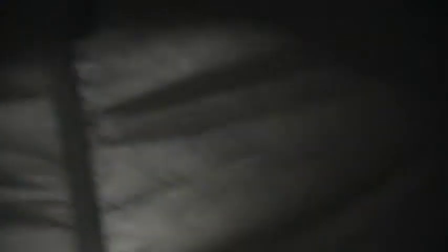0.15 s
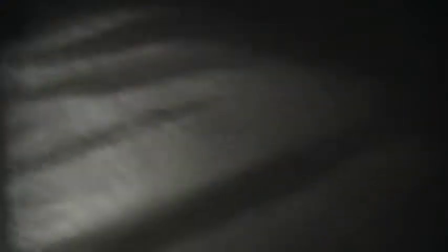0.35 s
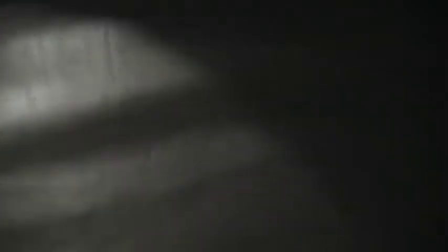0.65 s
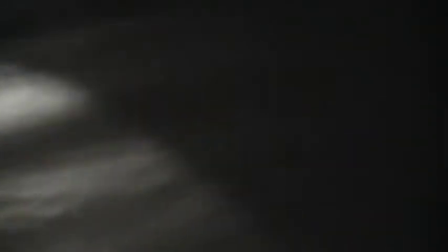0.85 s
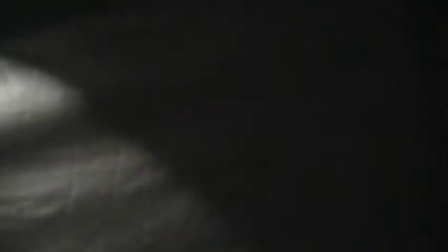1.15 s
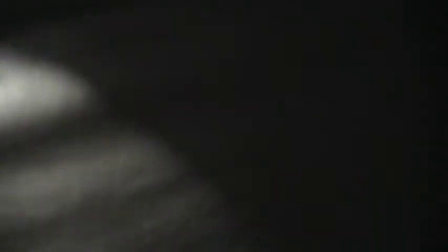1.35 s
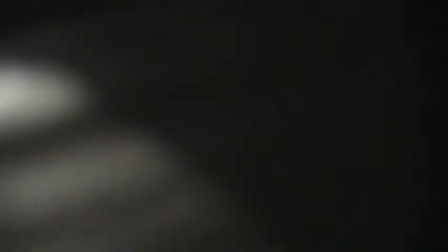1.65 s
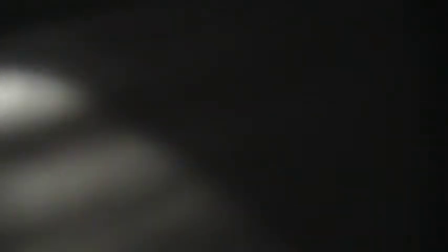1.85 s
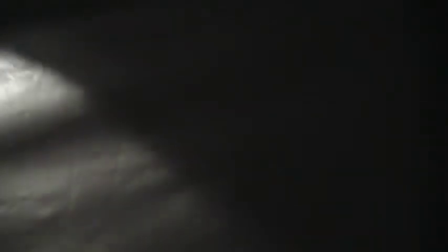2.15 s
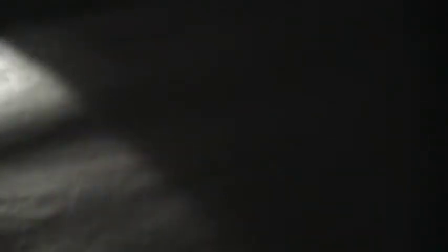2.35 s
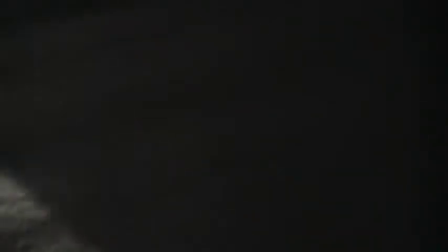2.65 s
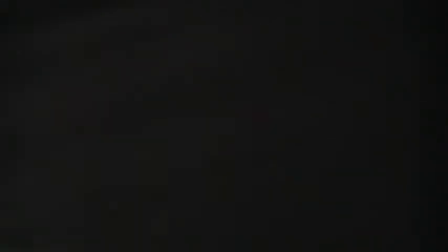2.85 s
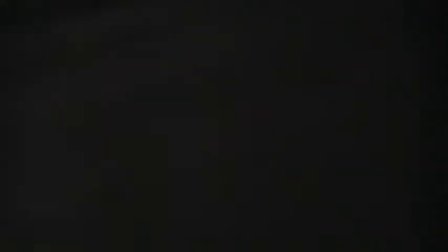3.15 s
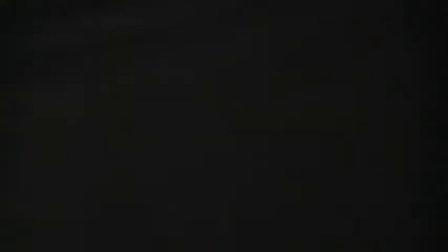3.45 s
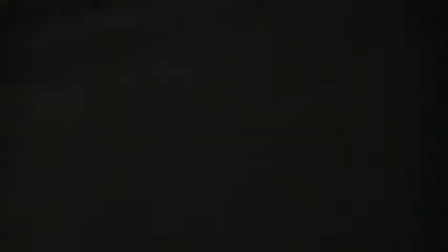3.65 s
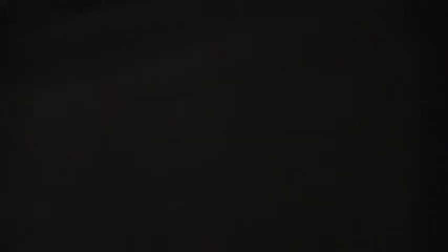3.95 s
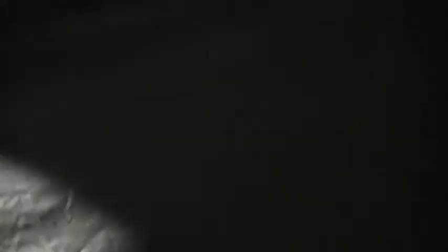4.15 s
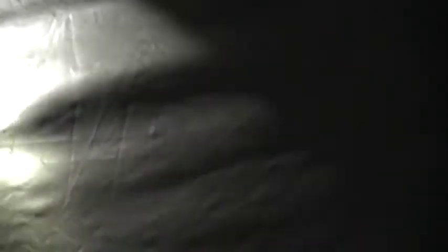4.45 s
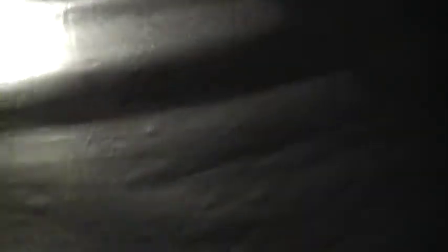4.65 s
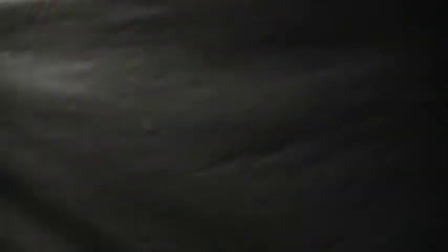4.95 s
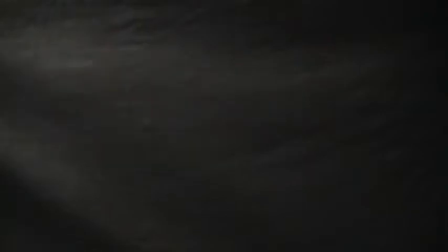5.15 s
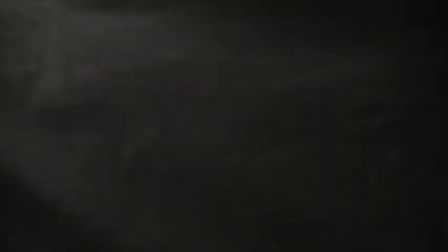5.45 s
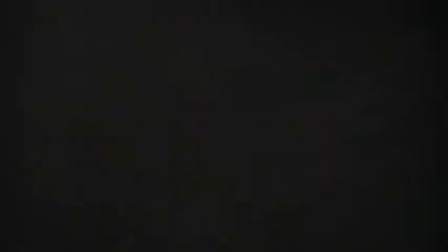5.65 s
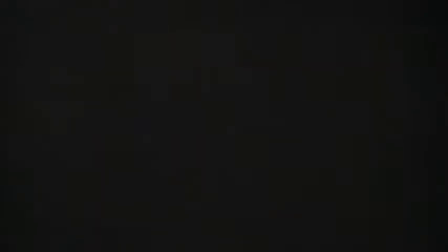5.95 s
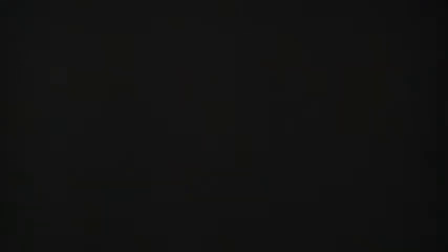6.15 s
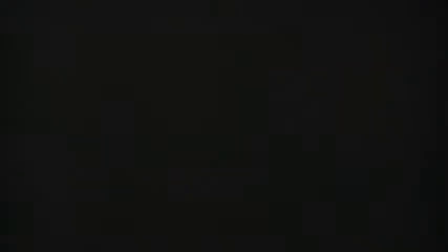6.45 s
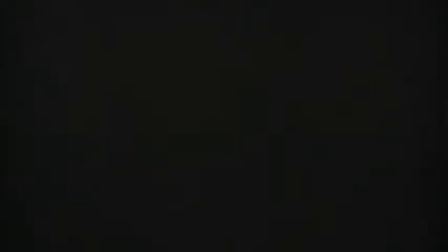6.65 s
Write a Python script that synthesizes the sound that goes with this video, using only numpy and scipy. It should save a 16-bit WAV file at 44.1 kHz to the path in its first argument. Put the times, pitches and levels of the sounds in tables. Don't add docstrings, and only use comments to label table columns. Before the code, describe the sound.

A buckle snaps sharply, nylon rustles, then a tent zipper buzzes open close by in fast and slow strokes over faint hiss.

```python
import sys
import numpy as np
from scipy import signal
from scipy.fft import rfft, irfft, next_fast_len
from scipy.io import wavfile
from scipy.ndimage import uniform_filter1d

SR = 44100
rng = np.random.default_rng(int(sys.argv[2]) if len(sys.argv) > 2 else 0)


def makeup_ratio(level_db):
    decades = np.asarray(level_db, float) / 20
    return 10 ** decades


def wav_record(signal):
    frames = np.transpose(np.atleast_2d(signal))
    bounded = np.clip(frames, -1, 1)
    quanta = np.round(bounded * 32767).astype(np.int16)
    wavfile.write(sys.argv[1], SR, quanta)


N = 299829


def line(table, column):
    columns = np.transpose(sorted(table))
    return np.interp(np.arange(N) / SR, columns[0], columns[column])


def span(table, fade_s=0.019):
    t = np.arange(N) / SR
    inside_s = np.minimum(t - table[0][0], table[-1][0] - t)
    return np.clip(inside_s / fade_s + 1, 0, 1)


def band(x, lo_hz, hi_hz):
    return signal.sosfilt(signal.butter(2, [lo_hz, hi_hz], "band", fs=SR, output="sos"), x)


def even(x, seconds):
    power = np.mean(np.atleast_2d(x) ** 2, axis=0)
    return x / np.sqrt(uniform_filter1d(power, int(seconds * SR)) + 1e-12)


def shape(x, gain_at):
    size = next_fast_len(N, True)
    hz = np.maximum(np.fft.rfftfreq(size, 1 / SR), 1)
    return irfft(rfft(x, size) * gain_at(hz), size)[..., :N]


def share_of(x, lo_hz, hi_hz, tilt):
    def step(f, hz):
        return np.sin(np.pi / 2 * np.clip(0.5 + np.log2(f / hz) / 0.9, 0, 1)) ** 2
    return shape(x, lambda f: (step(f, lo_hz) - step(f, hi_hz)) * f ** tilt)


def coloured(points):
    hz, db = np.transpose(points)
    white = rng.standard_normal((2, N))
    x = shape(white, lambda f: makeup_ratio(np.interp(np.log(f), np.log(hz), db, -90, -90)))
    return x / x.std()


def walk(rate_hz):
    hold = int(SR / rate_hz)
    steps = np.repeat(rng.standard_normal(N // hold + 1), hold)
    return 1.3 * uniform_filter1d(uniform_filter1d(steps, hold), hold)[:N]


def blend(pair, alike):
    alike = np.clip(alike, 0, 1)
    return np.array([pair[0], alike * pair[0] + np.sqrt(1 - alike ** 2) * pair[1]])


def grains(per_s, spread_db):
    present = rng.random((2, N)) < per_s / SR
    size_db = spread_db * np.minimum(rng.exponential(size=(2, N)), 4)
    return present * rng.standard_normal((2, N)) * makeup_ratio(size_db)


def knocks(times, sizes):
    at, out = np.asarray(times) * SR, np.zeros(N + 2)
    i = np.clip(at.astype(int), 0, N)
    np.add.at(out, i, sizes * (1 - at + i))
    np.add.at(out, i + 1, sizes * (at - i))
    return out[:N]


# pitch_hz, level_db (per Hz)
HUSH = [(12, -42), (20, -12), (75, -4.5), (124, -10.5), (155, -14), (257, -18.5), (630, -15.5),
        (1420, -31.5), (7030, -37.5), (8560, -28.5), (9310, -35.5), (13800, -33.5), (16300, -49)]
HUSH_DB = -56.5
# pitch_hz, level_db
MOTOR = [(7854, -86.5), (8473, -82), (11423, -85), (12662, -109), (13324, -90), (14077, -84.5)]


def hush():
    t = np.arange(N) / SR
    lines = 0
    for hz, db in MOTOR:
        cycles = hz * t + 0.3 * walk(12)
        lines = lines + makeup_ratio(db) * np.sqrt(2) * np.sin(2 * np.pi * cycles)
    return blend(coloured(HUSH), 0.29) * makeup_ratio(HUSH_DB + 0.29 * walk(1.7)) + lines


# peak_s, rise_s and fall_s (for 20 dB), level_db, brightness_db
RUSTLES = [(0.005, 0.06, 0.1164, -39, 1.5), (.21, .3, 0.14, -47.5, 4), (.43, .2, 0.1, -59, 5),
           (.556, 0.057, 0.28, -51, -4), (.602, 0.027, 0.16, -49, -7.5), (.68, .05, 0.74, -57, -4.5),
           (1.22, 0.11, .08, -65, 5), (2.37, .22, 0.1782, -51, -2.5), (2.483, .04, .12, -50, -5.5),
           (2.645, 0.018, 0.22, -48, 7), (3.16, .04, 0.3, -62, -6), (3.36, .25, 0.4, -52, 1),
           (3.57, 0.0614, 0.25, -53.5, -7.5), (3.749, 0.11, .05, -43.5, 0), (3.786, 0.0273, 0.8, -53, -9.5),
           (4.41, 0.24, 0.37, -44, 13.5), (4.65, .25, 0.39, -47, 12), (5.02, .1, 0.13, -52.5, 11),
           (6.34, .06, 0.15, -52, -5), (6.436, 0.013, 0.05, -43.5, -5.5), (6.497, 0.0136, 0.11, -52.5, 8.5)]
# start_s, length_s, level_db, brightness_db
SLIDES = [
    (0.072, 0.16, -53.5, 0),
    (0.929, 0.087, -64, 6.5),
    (2.63, 0.44, -50, 4),
    (3.096, 0.615, -63.5, 0.5),
    (4.271, 0.2, -46.5, 10.5),
    (4.98, 0.26, -56, -6),
    (6.175, 0.28, -55.5, -2.5),
    (6.235, 0.15, -52, 8),
    (6.461, .34, -61, -3),
]
SLIDE_RISE_S, SLIDE_FALL_S = 0.04, 0.0855
REST_DB, REST_BRIGHT_DB = -68, -3.5
# level_db, brightness_share
CLOTH_LAYERS = [(1.5, -1.05), (0.24, 0.14), (-2.5, 0.33), (-1.5, 1.035)]


def handling():
    t = np.arange(0, N + 64, 64) / SR
    moves = [(s, s, rise, fall, db, bright) for s, rise, fall, db, bright in RUSTLES]
    moves += [(s, s + length, SLIDE_RISE_S, SLIDE_FALL_S, db, bright) for s, length, db, bright in SLIDES]
    start, end, rise, fall, db, bright = np.transpose(moves)[..., None]
    level_db = db - 20 * (np.maximum(start - t, 0) / rise + np.maximum(t - end, 0) / fall)
    gains = []
    for own_db, share in CLOTH_LAYERS:
        resting = makeup_ratio(2 * (REST_DB + own_db + share * REST_BRIGHT_DB))
        moving = np.sum(makeup_ratio(2 * (level_db + own_db + share * bright)), axis=0)
        gains.append(np.interp(np.arange(N) / SR, t, np.sqrt(resting + moving)))
    return gains


CLOTH_EDGES_HZ = (100, 1700, 4500, 9000)
# pitch_hz, level_db (per Hz)
SHEEN = [(4710, -41.5), (8000, -23), (9200, -12.5), (11600, -7), (14000, -14.5), (15700, -18), (16300, -19)]


def cloth(tape_gain):
    pops, out = grains(1200, 4.4), 0
    stir = blend(pops / pops.std() * 0.3 + rng.standard_normal((2, N)), 0.35)
    gains = handling()
    shared_db = 0.55 * walk(17)
    for k, tilt in enumerate((-0.35, -0.15, -0.05)):
        part = share_of(stir, *CLOTH_EDGES_HZ[k:k + 2], tilt)
        out = out + part / part.std() * gains[k] * makeup_ratio(shared_db + 2.34 * walk(25.02))
    swish_gain = np.hypot(gains[-1], tape_gain) * makeup_ratio(shared_db + 1.6 * walk(270))
    return out + blend(coloured(SHEEN), 0.63) * swish_gain


CLICK_EDGES_HZ = (70, 560, 3400, 13000)
# start_s, peak_db, thud_db, edge_db, ring_t60_s
SNAPS = [(0.613, -22, -10, -38.5, 0.011), (0.618, -19, -14.5, -36, 0.037), (0.62, -10, -18, -10, 0.012),
         (0.624, -3.5, -18, -4, 0.011), (0.629, -8, -22, -9, 0.022), (0.65, -7, -18, -20, 0.014),
         (0.665, -25.5, -33, -49, 0.041), (3.696, -10.5, -45, -31, 0.0076), (3.719, -20, -36, -27, 0.012),
         (3.744, -22.5, -41, -36, 0.0079), (3.783, -27, -17, -57, 0.0081),
         (6.123, -24.5, -17.5, -25.5, 0.034), (6.432, -25, -38, -47, 0.015)]
# start_s, peak_db, thud_db, edge_db
TICKS = [(0.402, -37, -49, -63.5), (0.715, -30.5, -48, -61), (0.789, -29, -48, -64.5),
         (0.898, -38.5, -46, -62), (1.165, -50, -60, -55), (1.275, -48, -61, -56), (1.317, -39, -54, -60.5),
         (2.374, -38.5, -36, -46.5), (2.465, -41, -36.5, -55), (2.51, -39, -44, -47),
         (2.624, -44, -46.5, -43), (2.727, -32.5, -43.5, -35.5), (2.969, -53, -50.5, -57),
         (3.153, -36.5, -61, -61), (3.275, -43, -45, -60), (3.305, -43, -48, -60),
         (3.352, -37.5, -31, -53.5), (3.565, -48, -22, -47), (5.742, -29, -26, -34.5),
         (6.337, -48, -28, -50), (6.491, -46.5, -40, -32)]
TICK_T60_S = 0.017


def clicks():
    out, t = np.zeros((2, N)), np.arange(4000) / SR
    for s, body_db, thud_db, edge_db, t60 in SNAPS + [(*tick, TICK_T60_S) for tick in TICKS]:
        i = int(s * SR)
        layers = ((thud_db - 9.0, 1.5), (body_db, 1.05), (edge_db + 6.5, 0.45))
        for k, (db, longer) in enumerate(layers):
            part = band(blend(rng.standard_normal((2, len(t))), 0.84), *CLICK_EDGES_HZ[k:k + 2])
            crack = makeup_ratio(-60 * t / (longer * max(t60, 0.004)))
            tail = makeup_ratio(-32.0 - 60 * t / (13.3 * t60))
            out[:, i:i + len(t)] += (part / part.std() * (crack + tail) * makeup_ratio(db))[:, :N - i]
    return out


# start_s, peak_db
CREEP = [(4.958, -16), (4.973, -19), (4.991, -18), (5.016, -25), (5.024, -22), (5.039, -18.5), (5.05, -24),
         (5.064, -18), (5.091, -24), (5.102, -19.5), (5.116, -21), (5.122, -30), (5.142, -24),
         (5.15, -19.5), (5.168, -17), (5.181, -23), (5.186, -25), (5.197, -21.5)]


def creep():
    s, peak_db = np.transpose(CREEP)
    hit = knocks(s, makeup_ratio(peak_db))
    thump = band(hit, 110, 400) + 0.4 * band(hit, 400, 1100) + 0.04 * band(hit, 1300, 4000)
    return np.array([thump, thump]) * makeup_ratio(29.0)


# start_s, tooth_rate_hz, force_db
STROKES = [
    [(3.78, 199.8, -49.5), (3.84, 178, -40.5), (3.878, 243.7, -35), (4.03, 590, -26.5), (4.064, 620, -23),
     (4.092, 712, -23.5), (4.138, 705, -21.5), (4.162, 594.7, -22.5), (4.215, 225.1, -39)],
    [(4.262, 146.2, -39), (4.325, 143.6, -44), (4.39, 137.4, -35), (4.442, 143.8, -36), (4.5, 186, -33.5),
     (4.546, 150.4, -33), (4.7, 110.5, -37.5), (4.89, 83, -38), (4.97, 74.86, -44.5)],
    [(5.19, 81.5, -40.5), (5.24, 99.8, -38.5), (5.284, 168.7, -30.5), (5.356, 432.2, -29),
     (5.45, 690, -21.5), (5.5, 730, -24.5), (5.565, 715, -24), (5.612, 590.5, -22), (5.682, 220.1, -31.5)],
    [(5.745, 150, -38.5), (5.8, 171.9, -35), (5.846, 226.9, -29.5), (5.912, 320.2, -25),
     (5.955, 358.4, -21.5), (6.004, 356.8, -23), (6.038, 309.1, -25), (6.085, 215.9, -33.5),
     (6.165, 159.8, -40)],
]
# start_s, wall_slack_db, slider_grit_db
DOOR = [(3.8, -2, -6.5), (3.93, -7.5, -4), (4.04, -10, 2.5), (4.11, -4, -.5), (4.17, 3, 0), (4.4, 3, -4),
        (4.56, 6, -9), (4.9, 10.5, -13), (5.24, 8, -10), (5.33, 10.5, -6), (5.44, 4, -5),
        (5.61, -2.5, -2.5), (5.76, 5, -7), (5.86, -2, -8.5), (5.98, -13.5, -14.5), (6.1, -1.5, -8)]
# level_db (at 300 teeth per s), slope_db (per octave of speed), grit_share
ZIP_LAYERS = [(-0.02, -0.03, 0.011), (0.06, 0.4, 1.01), (-5, -1, 0.99), (-10, -.5, 1.3)]
WALL_KNEE_HZ, WALL_DB_PER_OCT = 383, -18


def strokes():
    pull = sum(STROKES, [])
    hz, force_db = line(pull, 1), line(pull, 2)
    slack_db, grit_db = line(DOOR, 1), line(DOOR, 2)
    gate = span(STROKES[0] + STROKES[1]) + span(STROKES[2] + STROKES[3])
    moving = gate * makeup_ratio(force_db)
    boom = makeup_ratio(slack_db + WALL_DB_PER_OCT * np.maximum(np.log2(hz / WALL_KNEE_HZ), 0))
    gains = [moving * boom]
    for db, slope, share in ZIP_LAYERS:
        gains.append(moving * makeup_ratio(db + slope * np.log2(hz / 300) + share * grit_db))
    return hz, grit_db, gains


PANEL_T60_S, PANEL_DB = 0.018, 2.0


def panel(x, count=3):
    t, out = np.arange(1024) / SR, 0
    tension = np.array([walk(14) for _ in range(count)])
    for weight in tension / np.sqrt(np.sum(tension ** 2, axis=0) + 1e-9):
        ring = blend(rng.standard_normal((2, len(t))), 0.87) * makeup_ratio(-60 * t / PANEL_T60_S)
        ring *= makeup_ratio(PANEL_DB) / np.sqrt(np.sum(ring[0] ** 2))
        out = out + signal.oaconvolve(x[None] * weight, ring, axes=1)[:, :N]
    return 0.45 * x + out


ZIP_EDGES_HZ = (70, 500, 1800, 3900, 9000)


def zipper(hz, grit_db, gains):
    phase = np.cumsum(hz * (1 + 0.037 * makeup_ratio(0.6 * grit_db) * walk(80))) / SR
    tooth = np.arange(1, int(phase[-1]))
    times = np.interp(tooth, phase, np.arange(N) / SR)
    period = 1 / hz[(times * SR).astype(int)]
    push_late, push_size, snap_late, snap_size = rng.standard_normal((len(tooth), 4)).T
    stumble = np.minimum(0.012 + 900 * period ** 2, 0.038)

    push = knocks(times + stumble * period * push_late, makeup_ratio((1.6 + 5 * stumble) * push_size))
    snap = knocks(times + (0.299 + 2 * stumble * snap_late) * period, makeup_ratio(-4.0 + 2.89 * snap_size))
    teeth = panel(even(push - snap, 0.04))
    puff = rng.standard_normal((2, N)) * (0.3 + np.exp(-(phase % 1) / 0.3))
    friction = blend(even(puff, 0.04), 0.4)

    rough = np.clip(0.27 + 15 / hz, 0, 0.38) * makeup_ratio(0.35 * grit_db + 2)
    grip_db, out = 1.3 * walk(60), 0
    layers = ((0.55, 0.35), (0.85, -0.08), (1.1, -0.5), (2.4, -0.4))
    for k, (noisier, tilt) in enumerate(layers):
        share = np.clip(rough * noisier, 0, 1)
        buzz = np.sqrt(1 - share) * teeth + np.sqrt(share) * friction
        part = share_of(buzz, *ZIP_EDGES_HZ[k:k + 2], tilt)
        out = out + even(part, 0.05) * gains[k] * makeup_ratio(grip_db + 1.1 * walk(45))
    return out


ZIP_LEFT_DB, HANDS_LEFT_DB = 4.5, 2.1


def scene():
    hz, grit_db, gains = strokes()
    side = np.array([[0.5], [-0.5]])
    door = (zipper(hz, grit_db, gains) + creep()) * makeup_ratio(ZIP_LEFT_DB * side)
    hands = (cloth(gains[-1]) + clicks()) * makeup_ratio(HANDS_LEFT_DB * side)
    return (door + hands) * makeup_ratio(-0.3) + hush()


def band_limit(x):
    return signal.sosfilt(signal.butter(12, 16460, fs=SR, output="sos"), x)


# pitch_hz, lead_rad
LEAD = [(100, .75), (500, 1.1), (1000, 1.3), (1900, 1.1), (3000, 1.6), (5200, 2.4), (8500, 3.2),
        (11300, 4.4), (13500, 5.4), (16000, 6.1)]
TOP_HZ = 15830


def record(dry):
    hz, rad = np.transpose(LEAD)
    half_turn = np.array([[0.5j], [-0.5j]])
    ports = shape(dry, lambda f: np.exp(half_turn * np.interp(f, hz, rad)))
    rounded = 0.9 * np.tanh(ports / 0.9)
    mix = shape(rounded, lambda f: np.clip((TOP_HZ - f) / 160, 0, 1))
    return band_limit(mix)


dry = scene()
out = record(dry)
wav_record(out)
```